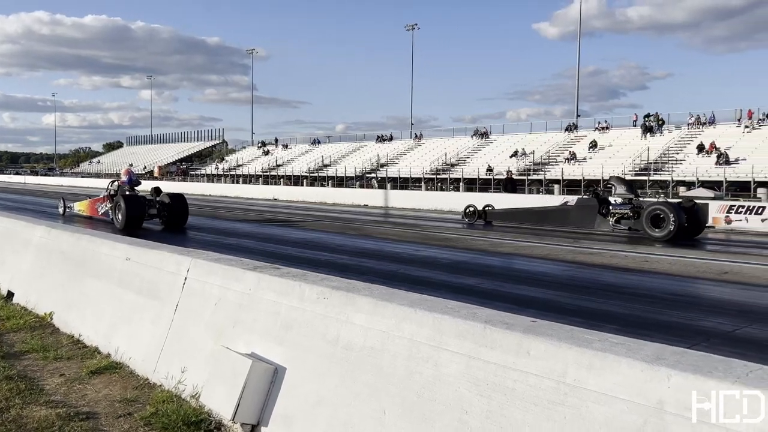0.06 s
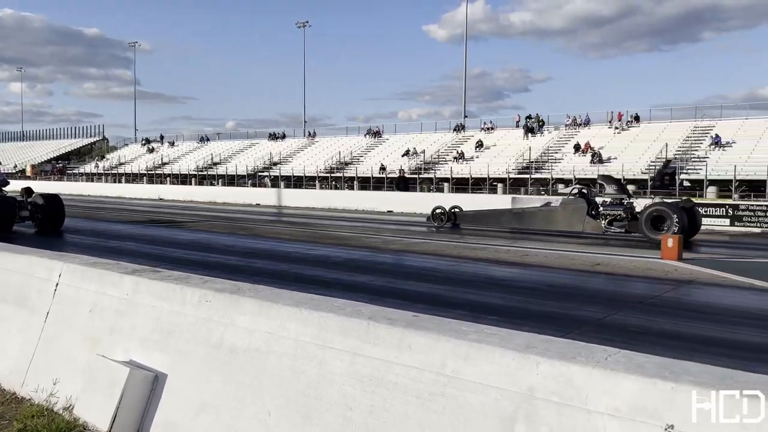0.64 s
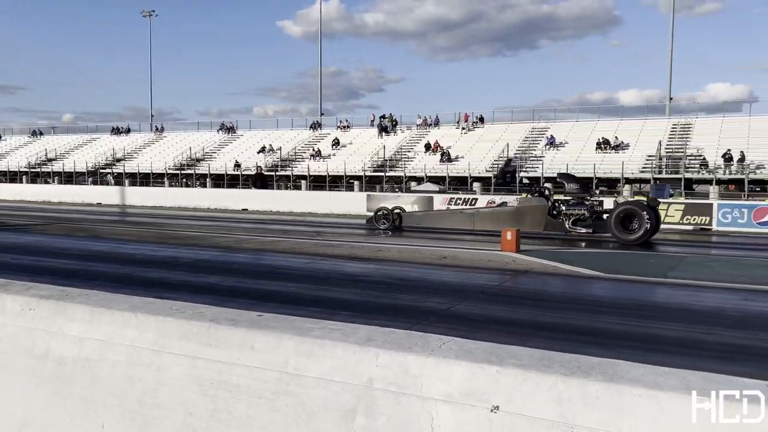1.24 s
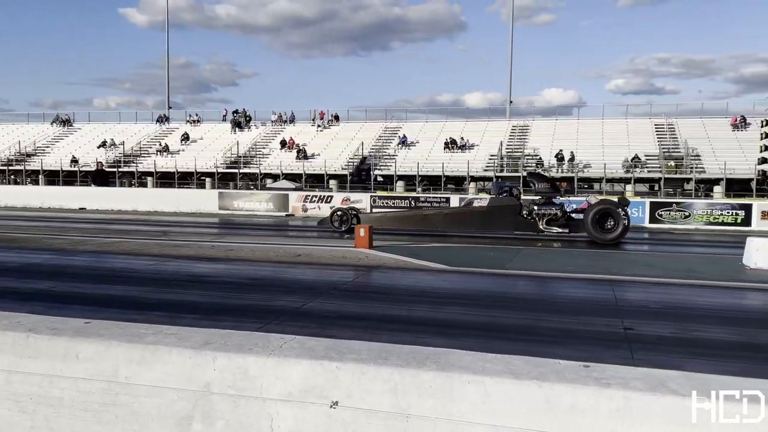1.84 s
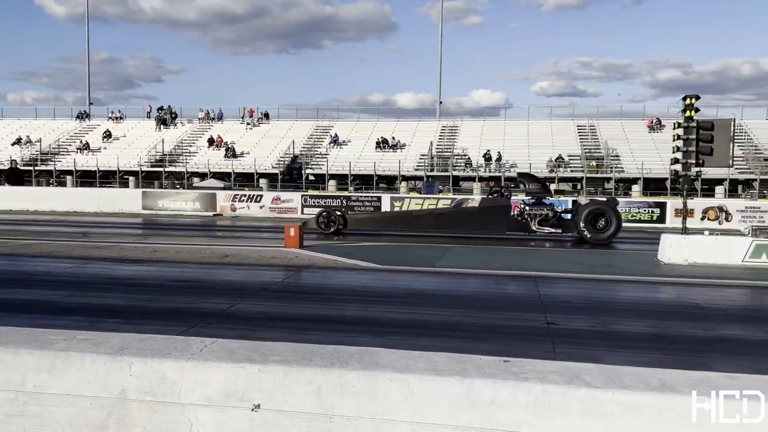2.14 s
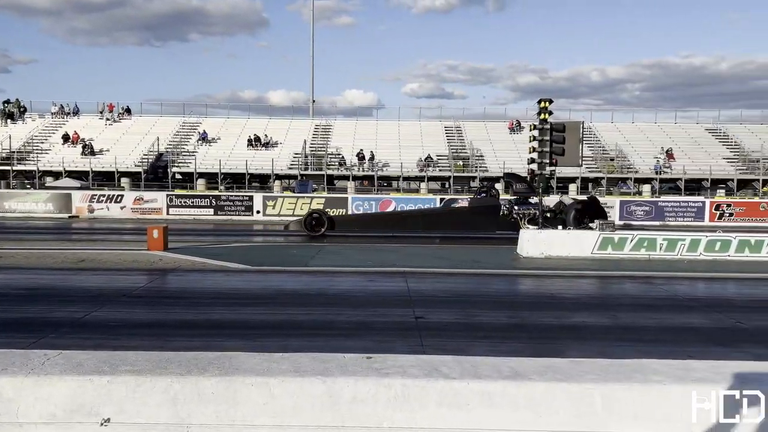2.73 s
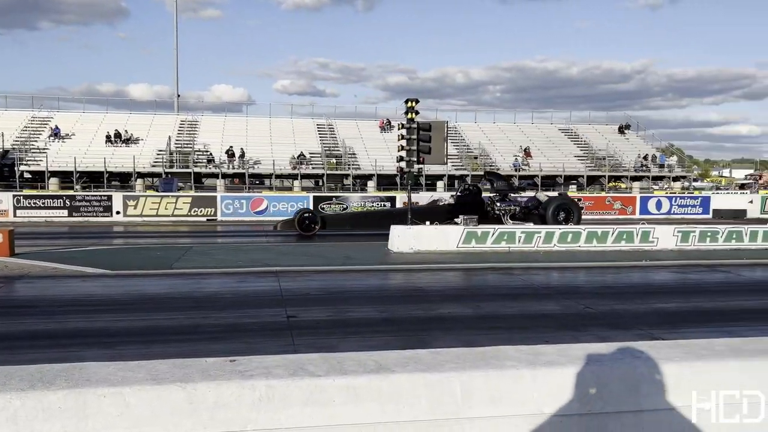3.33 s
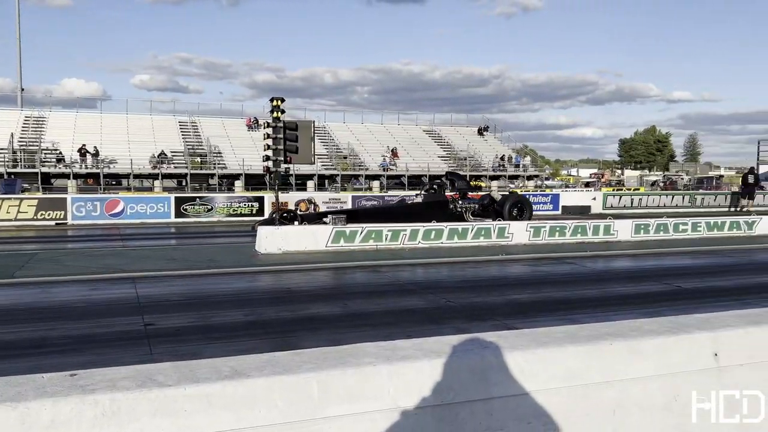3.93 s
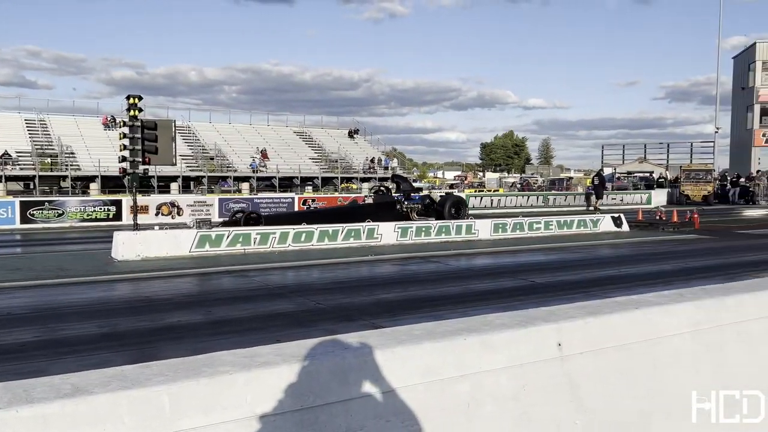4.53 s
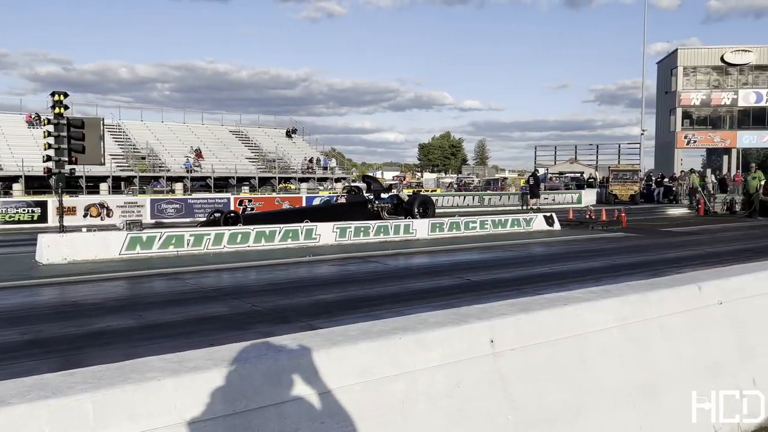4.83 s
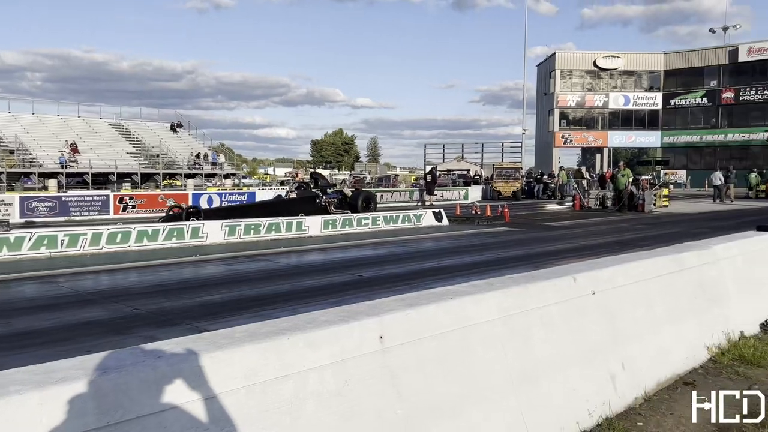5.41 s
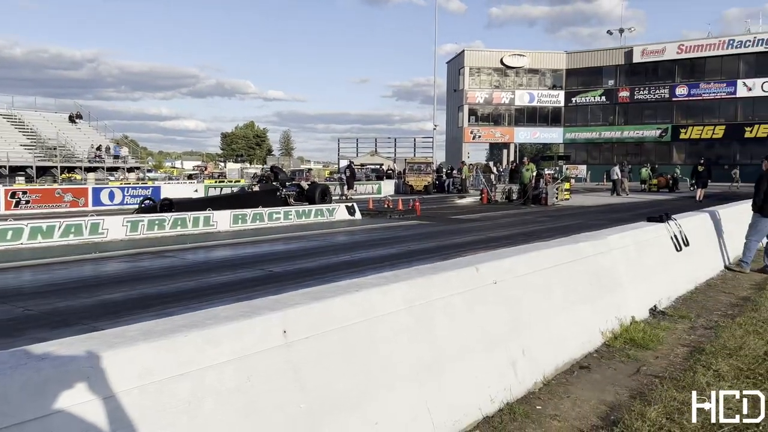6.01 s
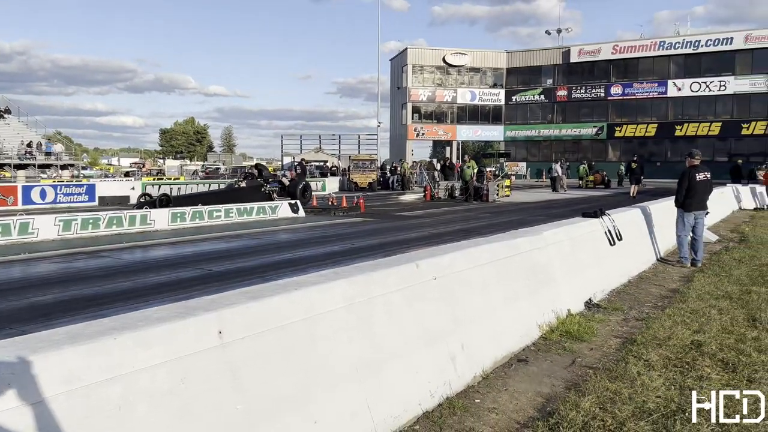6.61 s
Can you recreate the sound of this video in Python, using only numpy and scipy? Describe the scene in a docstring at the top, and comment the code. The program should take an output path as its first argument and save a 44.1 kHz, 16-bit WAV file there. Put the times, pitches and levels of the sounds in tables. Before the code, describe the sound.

A dragster's lumpy idle rumbles closer and louder, its exhaust crackling and popping, while a second one rolls away.

```python
"""At the starting line of a drag strip, two V8 dragsters idle through open headers.
One rolls away while the other, the main car, grows louder. Uneven firings make a loping boom,
a bark and a rasp of turbulent gas; unburnt fuel cracks in the pipes, often twice in a row.
A wall and the grandstands echo, and a hand-held phone hears it all through two spaced ports."""
import sys
import numpy as np
from scipy import signal
from scipy.fft import rfft, irfft, next_fast_len
from scipy.io import wavfile
from scipy.ndimage import uniform_filter1d

SR = 44100
rng = np.random.default_rng(int(sys.argv[2]) if len(sys.argv) > 2 else 0)


def master_out(mix):
    """Clip the mix to full scale and print it as 16-bit PCM to the path in sys.argv[1]."""
    frames = np.transpose(np.atleast_2d(mix))
    ceiling = np.clip(frames, -1, 1)
    pcm = np.round(ceiling * 32767).astype(np.int16)
    wavfile.write(sys.argv[1], SR, pcm)


N = 293706
TIME = np.arange(N) / SR
MAX_FIRINGS = 1300

# relative strength of the eight firings of a cycle, the far bank shaded by the car: level_db
CYLINDER_DB = [4.5, 1.5, 3.5, -9.5, 2, -2, -2.5, -5]
# relative levels of the exhaust's four bands: time_s, bark_db, blat_db, rasp_db, hiss_db
EXHAUST_LEVELS = [(0.0, -29.5, -43, -56, -42.5), (0.24, -29.5, -43.5, -55.5, -53.5),
                  (0.83, -34, -46, -58, -53.5), (1.09, -31.5, -45.5, -54, -49),
                  (1.45, -32, -46, -55.5, -54.5), (1.91, -32.5, -43, -52.5, -50.5),
                  (2.95, -33.5, -43.5, -50.5, -55), (4.99, -31.5, -40.5, -44.5, -51),
                  (6.42, -24.5, -38, -44.5, -47.5), (6.66, -26.5, -37, -43.5, -50)]
# fuel cracks, relative levels: start_s, snap_db, knock_db, bite_db (dry snaps omit the last two)
FUEL_CRACKS = [(.004,-30), (.0195,-34), (0.073,-28,-40.5,-36), (.119,-31), (0.137,-28),
               (0.1588,-23,-38,-31), (.205,-30), (.31,-36), (.543,-35), (.552,-37), (0.723,-28.5),
               (.843,-29), (.9028,-33), (0.998,-25,-44,-46), (1.1348,-37), (1.264,-27,-37.5,-42),
               (1.3421,-30,-42,-43), (1.557,-32.5,-38,-50), (1.7161,-34,-48,-38), (1.7689,-36),
               (1.7948,-35), (1.8265,-32,-36,-45), (2.157,-31,-34.5,-47), (2.2378,-35), (2.4653,-38),
               (2.5247,-36), (2.5745,-37), (3.0957,-33.5,-43,-40), (3.1964,-35,-39,-33.5),
               (3.259,-40,-37,-33), (3.5783,-31), (3.5979,-27,-32,-28), (3.657,-33.5,-39,-36),
               (3.788,-26,-37,-45), (3.8412,-20), (3.905,-21.5,-32.5,-45), (4.0077,-18.5,-29.5,-34),
               (4.0387,-30,-30.5,-44), (4.0677,-18), (4.1684,-17.5,-29,-40), (4.2286,-21.5,-36,-33),
               (4.2813,-27,-32.5,-38), (4.335,-26.5,-31.5,-29), (4.346,-28.5,-36,-32), (4.3975,-14.5),
               (4.504,-22.5,-25,-43), (4.532,-25,-25,-28.5), (4.562,-14), (4.6661,-23,-27.5,-30),
               (4.744,-30), (4.7827,-25.5,-35,-42), (4.8144,-21.5,-28,-30), (4.8363,-15),
               (4.9437,-22,-28,-25), (4.9735,-24.5,-31,-41), (4.994,-19,-28,-38), (5.0067,-25,-30,-28),
               (5.0575,-25.5), (5.1682,-20,-33,-47), (5.231,-19.5,-29,-33), (5.262,-20.5,-26.5,-41),
               (5.2844,-18.5,-28,-41), (5.334,-24,-30,-40), (5.4833,-17), (5.507,-18.5),
               (5.5184,-20,-28,-44), (5.5403,-14.5), (5.6511,-22,-36,-32), (5.672,-14.5,-26.5,-28),
               (5.683,-22), (5.7904,-21.5), (5.8216,-23,-35,-33), (5.8443,-13), (5.855,-21,-28.5,-32),
               (5.906,-22,-30.5,-30), (5.957,-20,-32,-33), (6.0138,-20,-31,-31), (6.024,-26),
               (6.0751,-21,-33,-30), (6.1854,-18,-32.5,-32), (6.217,-28), (6.251,-24,-27.5,-26),
               (6.3026,-23.5,-33.5,-32.5), (6.354,-23,-37.5,-35.5), (6.4165,-26.5,-39,-33.5),
               (6.554,-22,-34,-29.5), (6.6083,-26,-30.5,-28), (6.618,-22.5)]


def from_db(db):
    """Decibels to amplitude ratio."""
    return 10 ** (np.asarray(db) / 20)


def unit_rms(x):
    """Normalisation to unit mean power."""
    return x / np.sqrt(np.mean(x ** 2) + 1e-20)


def in_time(rows):
    """Linear interpolation of each column after time_s to every sample."""
    times_s, *columns = np.transpose(rows)
    return [np.interp(TIME, times_s, column) for column in columns]


def swells(rows, width_s, after_s=0):
    """Superposed Gaussian bells, one for each row of time_s, height."""
    coarse = TIME[::40]
    bells = sum(height * np.exp(-((coarse - s - after_s) / width_s) ** 2) for s, height in rows)
    return np.interp(TIME, coarse, bells)


def drift(rate_hz):
    """Low-passed noise: a smooth random wander of unit RMS."""
    pole = np.exp(-2 * np.pi * rate_hz * 40 / SR)  # one step per 40 samples
    slow = signal.lfilter([1], [1, -2 * pole, pole ** 2], rng.standard_normal(N // 40 + 2002))[2000:]
    return np.interp(np.arange(N) / 40, np.arange(len(slow)), unit_rms(slow))


def coloured(x, spectrum, size=8192):
    """Minimum-phase filter of unit energy, shaped by rows of frequency_hz, level_db."""
    hz = np.fft.rfftfreq(size, 1 / SR) + 1
    skirts = np.minimum(hz / spectrum[0][0], 1) * np.minimum(spectrum[-1][0] / hz, 1) ** 2
    cepstrum = irfft(np.log(from_db(at_hz(spectrum, hz)) * skirts))
    cepstrum[1:size // 2] *= 2  # folding the cepstrum makes the filter causal
    cepstrum[size // 2 + 1:] = 0
    response = irfft(np.exp(rfft(cepstrum)))
    return signal.oaconvolve(x, response / np.linalg.norm(response))[:N]


def at_hz(points, hz):
    """Interpolation on a logarithmic frequency axis."""
    points_hz, values = np.transpose(points)
    return np.interp(np.log(hz + 1), np.log(points_hz), values)


def evened(x, span_s):
    """Division by the running RMS: slow swings vanish, faster throbs stay."""
    width = int(span_s * SR)
    power = uniform_filter1d(uniform_filter1d(x ** 2, width), width)
    return x / np.sqrt(np.abs(power) + 1e-12)


def resonance(x, hz, width_hz):
    """A second-order resonator passes the band that rings."""
    return signal.lfilter(*signal.iirpeak(hz, hz / width_hz, fs=SR), x)


def main_cycles():
    """Phase is the integral of speed: the main engine's running count of four-stroke cycles."""
    # idle, with one blip of the throttle to roll forward: time_s, cycle_rate_hz
    idle_speed = [(0, 22.42), (0.55, 21.23), (0.8, 20.34), (1.1, 23.0), (1.4, 24.09), (2.05, 22.46),
                  (2.35, 21.04), (2.85, 19.54), (3.35, 19.87), (4.1, 19.28), (5, 19.41), (6.0, 18.74),
                  (6.66, 19.13)]
    # the slow idle hunts: time_s, droop_hz
    droops = [(3.83, 1.6), (4.33, 1.0), (4.72, 1.7), (5.49, 1.4), (5.78, .6), (6.08, .8)]
    droop = swells(droops, width_s=.085)
    overshoot = uniform_filter1d(droop, int(.96 * SR))
    speed = in_time(idle_speed)[0] - droop + overshoot
    return np.cumsum(speed * (1 + .006 * drift(6))) / SR


def firings(cycles, uneven_db, jitter, pattern_depth):
    """An impulse train, cylinder by cylinder; the rich idle burns each charge differently."""
    index = np.arange(MAX_FIRINGS)
    timing, burn = rng.standard_normal((MAX_FIRINGS, 2)).T
    onsets = np.searchsorted(cycles, (index + jitter * timing) / len(CYLINDER_DB))
    pattern_db = pattern_depth * np.resize(CYLINDER_DB, MAX_FIRINGS)
    clicks = np.zeros(N + 1)
    clicks[onsets] = from_db(pattern_db + uneven_db * np.minimum(burn, 1))
    return clicks[:N]


def lope():
    """Amplitude modulation of the boom in dB: the engine misses, sags, then catches with a surge."""
    # misses: time_s, sag_db
    stumbles = [(.325, 10), (.462, 4), (.719, 6), (1.102, 8), (1.222, 7), (1.33, 7), (1.481, 10),
                (1.62, 8.5), (2.257, 7), (2.508, 4.5), (2.989, 4), (3.255, 6), (3.541, 5.5), (3.732, 9),
                (4.778, 10.5), (5.12, 6), (5.213, 9), (5.482, 7), (5.622, 7), (6.167, 5.5), (6.525, 7)]
    sag = swells(stumbles, width_s=.019)
    catch = .31 * swells(stumbles, width_s=.042, after_s=.1)
    return drift(13) - sag + catch


def boom(cycles):
    """Three harmonics of the cycle rate (engine orders) beat over the rumble of uneven firings."""
    # engine orders against the whole boom: time_s, third_db, fourth_db, fifth_db
    order_levels = [(0, -30, -4, -13), (1.2, -28, -5, -14), (2.5, -26, -9.5, -4), (6.66, -20, -5.5, -3.5)]
    # spectrum of the rumble: frequency_hz, level_db
    rumble_spectrum = [(25, -44), (42, -15), (52, -15), (63, 3.5), (72, 3.5), (88, 4.5), (100, 2),
                       (112, -7), (130, -4.5), (150, -14), (180, -25)]
    # the boom grows as the pipes turn towards the phone: time_s, level_db
    boom_level = [(0.0, -26), (0.59, -24.5), (1.45, -25.5), (3.3, -19.5), (6.38, -17)]
    gains = from_db(in_time(order_levels))
    orders = sum(gain * np.sqrt(2) * np.sin(2 * np.pi * (order * cycles + rng.random()))
                 for order, gain in enumerate(gains, 3))
    clicks = firings(cycles, uneven_db=7, jitter=.29, pattern_depth=.14)
    rumble = evened(coloured(clicks, rumble_spectrum), span_s=.56)
    rumble_gain = from_db(-2) * np.sqrt(np.maximum(1 - np.sum(gains ** 2, axis=0), .1))
    level_db = in_time(boom_level)[0] + lope() + 2.15
    return from_db(level_db) * evened(orders + rumble_gain * rumble, span_s=.052)


def puffs(clicks, rise_s):
    """Convolution turns each impulse into the envelope of a gush of gas that swells and dies."""
    age = np.arange(SR // 20) / SR / rise_s
    return unit_rms(np.abs(signal.oaconvolve(clicks, age * np.exp(1 - age))[:N]))


def headers(cycles, surge_db=0):
    """Source and filter: firing pulses and the turbulent gas they release excite four exhaust bands."""
    # spectra of the bands, low to high: frequency_hz, level_db
    bark_spectrum = [(70, -50), (125, 5.5), (160, 0.5), (200, 1), (255, 4.5), (310, -5), (380, -7.5),
                     (520, -38.5)]
    blat_spectrum = [(250, -23), (430, 0.5), (700, 0.5), (920, -3.5), (1150, -8), (1600, -45)]
    rasp_spectrum = [(700, -15), (1150, 4.5), (1550, 5), (2250, 4), (2900, 9), (3600, -16), (4800, -43)]
    hiss_spectrum = [(2200, 3), (4100, 4.5), (7000, -0.5), (9000, -0.5), (12000, -1), (14000, -9.5),
                     (16000, -34)]
    bark_db, blat_db, rasp_db, hiss_db = in_time(EXHAUST_LEVELS)
    clicks = firings(cycles, uneven_db=6, jitter=.11, pattern_depth=.6)
    knock = unit_rms(clicks)
    gas = puffs(clicks, rise_s=.002)
    sputter = puffs(clicks * (.18 + rng.random(N) ** 7), rise_s=.0012)  # a few firings stand out
    jets = (gas + .74) * rng.standard_normal((3, N))
    spray = (sputter + .75) * rng.standard_normal(N)
    bark_db = bark_db + surge_db + drift(18)  # uneven burning makes the bark throb
    bark = from_db(bark_db + 1) * evened(coloured(knock + .33 * jets[0], bark_spectrum), span_s=.18)
    blat = from_db(blat_db + 5.5) * evened(coloured(knock + .74 * jets[1], blat_spectrum), span_s=.75)
    rasp = from_db(rasp_db + 4.5) * evened(coloured(.18 * knock + jets[2], rasp_spectrum), span_s=.43)
    hiss = from_db(hiss_db + 3.2) * evened(coloured(spray, hiss_spectrum), span_s=.057)
    return bark + blat + rasp + hiss


def with_body(rows):
    """A dry snap's knock and bite scale with its peak: fill in those two columns."""
    return [(s, db, *(body or (db - 16.5, db - 20))) for s, db, *body in rows]


def cracks(rows):
    """Afterfire: unburnt fuel flashes in gritty shocks; the pipe knocks, car and track scatter it."""
    # spectra of the bright snap, the low knock and the bite between them: frequency_hz, level_db
    snap_spectrum = [(1500, -2), (2500, 14), (3200, -9.5), (3950, 7.5), (4350, 2), (4800, 6.5), (5400, 4),
                     (6000, 6.5), (7200, 3), (8400, 9.5), (9800, 10.5), (12000, 5.5), (14000, 0.5),
                     (16000, -19)]
    knock_spectrum = [(300, 5), (750, 6), (1200, -1), (1550, 2.5), (2000, 0), (2700, -3.5), (3400, -17)]
    bite_spectrum = [(1400, -17.5), (2000, -2.5), (2600, 7), (3300, -4), (4000, -11.5)]
    rise_s, repeat_s, glance_lag_s = .0032, .0105, .0003
    tail_decay_s, knock_decay_s, bite_decay_s = .0048, .0079, .005
    snaps, knocks, bites = np.zeros((3, N + SR))
    age = np.arange(SR // 12) / SR
    attack = np.minimum(age / rise_s, 1)
    tail = from_db(-18) * np.exp(-age / tail_decay_s) * attack
    for start_s, snap_db, knock_db, bite_db in with_body(rows):
        grain, spread, gas = rng.standard_normal((3, len(age)))
        half_length_s = .0018 * from_db(rng.standard_normal())
        burst = np.exp(-((age - rise_s) / half_length_s) ** 4)
        # the next charge in the same bank may catch too, more weakly
        repeat_gain = from_db(-16 + 7 * rng.uniform(-1, 1))
        repeat = repeat_gain * np.exp(-((age - rise_s - repeat_s) / half_length_s) ** 4)
        shocks = grain * from_db(-6.5 * np.clip(spread, -2, 2))
        # a reflection off the car comb-filters each crack differently
        reflection = np.roll(shocks, 2 + int(rng.random() * glance_lag_s * SR))
        shocks = unit_rms(shocks + .4 * reflection)
        start = max(int((start_s - .001) * SR), 0)
        span = slice(start, start + len(age))
        snaps[span] += from_db(snap_db - 6.3) * (burst + repeat + tail) * shocks
        knocks[span] += from_db(knock_db + 9.5) * attack * np.exp(-age / knock_decay_s) * gas
        bites[span] += from_db(bite_db + 8) * attack * np.exp(-age / bite_decay_s) * gas
    return (coloured(snaps[:N], snap_spectrum) + coloured(knocks[:N], knock_spectrum)
            + coloured(bites[:N], bite_spectrum))


def faint_cracks(cycles, spit_share=.13):
    """Random firings spit a little fuel: dry snaps just above the hiss, as rows of start_s, snap_db."""
    index = np.arange(int(cycles[-1] * len(CYLINDER_DB)))
    chance, strength = rng.random((MAX_FIRINGS, 2))[index].T
    start_s = np.interp(index / len(CYLINDER_DB), cycles, TIME)
    hiss_db = np.interp(start_s, TIME, in_time(EXHAUST_LEVELS)[-1])
    snap_db = hiss_db + 13 + 4 * (2 * strength - 1)
    return np.column_stack([start_s, snap_db])[chance < spit_share]


def surges():
    """Amplitude modulation of the bark in dB: a swell around each crack, as strong as its knock."""
    start_s, _, knock_db, _ = np.transpose(with_body(FUEL_CRACKS))
    swell = swells(zip(start_s, from_db(knock_db - knock_db.max())), width_s=.043)
    return 3 * (swell - uniform_filter1d(swell, SR))


def shifting_colour(x):
    """The main car's tone shifts: spectral peaks and hollows from pipes, ground reflection and phone."""
    # bands lifted or cut: centre_hz, width_hz, early_db, middle_db, late_db
    peaks_and_hollows = [(168, 22, 0, -2, -3), (268, 35, 5, 2, 1.5), (372, 150, -3, 0.5, 3),
                         (555, 80, -6, -5, -8), (685, 140, -2.5, 0.5, 2.5), (890, 106, 2, 3.5, 3),
                         (1190, 150, 0, 0, -7), (1530, 360, -1, 2.5, 1.5), (2280, 450, -1, -2, -1.5),
                         (3260, 480, 0, -2, -5), (3800, 330, 3, 0, 3.5), (4410, 370, -2, -1.5, -2),
                         (5130, 340, 3.5, 1.5, 3)]
    # the early, middle and late moments: time_s
    colour_times_s = [3.17, 4.9, 6.1]
    for hz, width_hz, *lift_db in peaks_and_hollows:
        gain = from_db(np.interp(TIME, colour_times_s, lift_db))
        x = x + (gain - 1) * resonance(x, hz, width_hz)
    return x


def second_car(cycles, pops, share):
    """Its own pipes and position filter the second exhaust; the cracks excite a hollow resonance."""
    # colour of this car: frequency_hz, level_db
    tint = [(120, -4), (165, 4), (240, 1.5), (330, 2), (450, -1), (870, 1), (1350, 0), (1650, 6.5),
            (2050, 0.5), (2400, -4), (2800, -1.5), (3200, 7), (3600, 1.5), (4100, 8.5), (4600, 0),
            (5100, -8), (5600, -0.5), (7400, 5), (10200, -7), (12000, 2)]
    hollow_pops = pops + from_db(-12) * resonance(pops, hz=1690, width_hz=260)
    return np.sqrt(share) * coloured(from_db(-4.5) * headers(cycles) + share * hollow_pops, tint)


def ports(main, other):
    """Path difference and shadowing: each car reaches the two ports at unequal phase and level."""
    # phase by which the left port leads, for the main car: frequency_hz, lead_rad
    main_phase = [(40, 0.25), (280, 0.86), (560, 2.06), (1100, 3.5), (1800, 4), (2400, 7.5), (3300, 11),
                  (4400, 12), (5500, 16), (7060, 19.5), (7700, 24), (9700, 22.5), (11200, 19.8),
                  (15400, 20)]
    # shadow of the phone's body, left minus right: frequency_hz, difference_db
    shadow = [(110, 0), (200, 2), (700, 3.5), (1300, 2.5), (2400, -1.5), (4400, 21.5), (6200, 7.5),
              (8100, -1.5), (12000, 0)]
    size = next_fast_len(N + SR // 10)
    hz = np.fft.rfftfreq(size, 1 / SR)
    main_lead = np.interp(hz, *np.transpose(main_phase))
    other_lead = -2 * np.pi * hz * 99e-6  # 99 microseconds later on the left
    stereo = np.zeros((2, N))
    for car, lead, shade in (main, main_lead, .95), (other, other_lead, .05):
        left = from_db(shade * at_hz(shadow, hz) / 2) * np.exp(.5j * lead)
        stereo += irfft(rfft(car, size) * [left, 1 / left], size)[:, :N]
    return stereo


def shifting_path(x, spread_s=.0007):
    """Propagation delay wanders as the cars roll and the phone turns."""
    return np.interp(TIME - spread_s * (2 + drift(.394)), TIME, x)


def wall(x, decay_s=.0025, low_hz=1970):
    """Early reflections: a short, bright scatter off the concrete wall, different at each port."""
    age = np.arange(SR // 25) / SR
    response = rng.standard_normal((2, len(age))) * np.exp(-age / decay_s)
    bright = signal.sosfilt(signal.butter(2, low_hz, "high", fs=SR, output="sos"), x)
    return signal.oaconvolve(bright[None], response / np.linalg.norm(response[0]), axes=1)[:, :N]


def grandstands(x):
    """Diffuse reverberation: the treble dies first, and the bass is coherent between the ports."""
    # reverberation time of walls and stands: frequency_hz, t60_s
    decay_times = [(150, 1), (1000, 0.17), (4000, 0.32), (14000, 0.014)]
    age = np.arange(SR) / SR
    edges_hz = np.geomspace(60, 16000, 9)
    response = np.zeros((2, SR))
    for low, high in zip(edges_hz, edges_hz[1:]):
        hz = np.sqrt(low * high)
        band = signal.butter(2, [low, high], "band", fs=SR, output="sos")
        mid, side = signal.sosfilt(band, rng.standard_normal((2, SR)))
        coherence = np.sinc(hz / 1100)
        pair = np.sqrt(1 + coherence) * mid + np.sqrt(1 - coherence) * np.array([side, -side])
        response += pair * from_db(-60 * age / at_hz(decay_times, hz))
    response *= np.minimum(age / .00091, 1)
    return signal.oaconvolve(x[None], response / np.linalg.norm(response[0]), axes=1)[:, :N]


def scene():
    """Superposition of both cars' direct sound and their echoes."""
    # power crossfade towards the main car: time_s, main_share
    blend = [(0, 0.29), (1.0, 0.17), (2.0, 0.44), (3.0, 0.71), (4.5, 0.87), (6.66, 0.95)]
    share = in_time(blend)[0]
    cycles = main_cycles()
    other_speed_hz = 18.8 * (1 + .03 * drift(2))
    pops = cracks([*FUEL_CRACKS, *faint_cracks(cycles)])
    main = np.sqrt(share) * shifting_colour(from_db(-1.06) * headers(cycles, surges()) + pops)
    other = second_car(np.cumsum(other_speed_hz) / SR, pops, 1 - share)
    direct = ports(main + boom(cycles), other)
    delayed = shifting_path(main + other)
    return direct + from_db(-5.5) * wall(delayed) + from_db(-16) * grandstands(delayed)


def record(dry):
    """Soft saturation rounds the peaks, and a steep low-pass limits the bandwidth."""
    fade_in_s, ceiling, cutoff_hz = .008, .95, 15700
    rounded = ceiling * np.tanh(dry * np.minimum(TIME / fade_in_s, 1) / ceiling)
    return signal.sosfilt(signal.ellip(10, .1, 80, cutoff_hz, fs=SR, output="sos"), rounded)


dry = scene()
out = record(dry)
master_out(out)
```